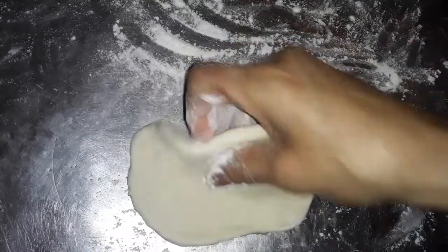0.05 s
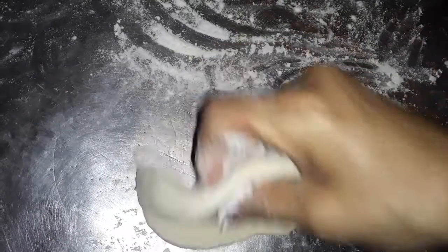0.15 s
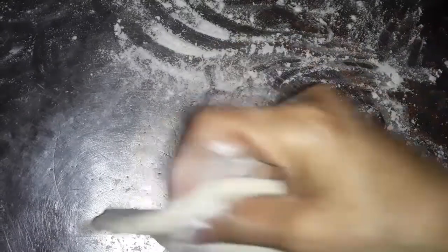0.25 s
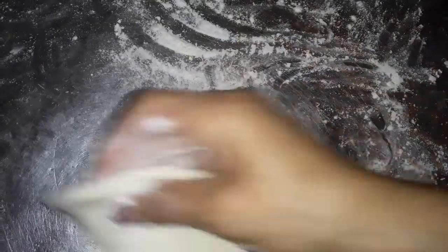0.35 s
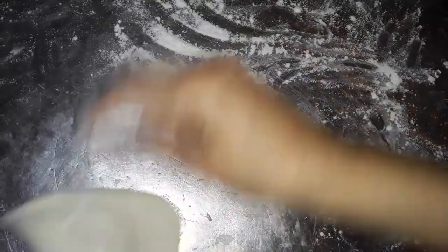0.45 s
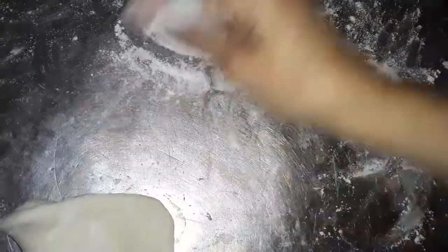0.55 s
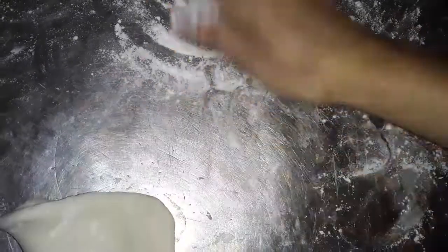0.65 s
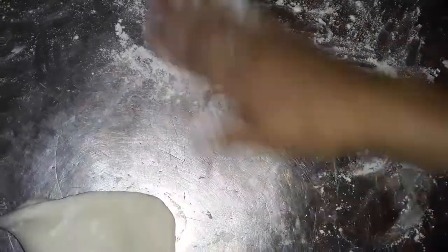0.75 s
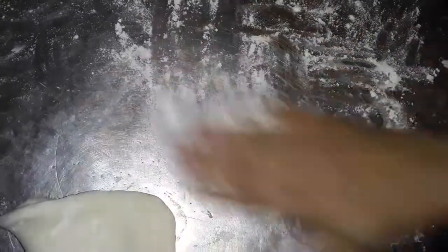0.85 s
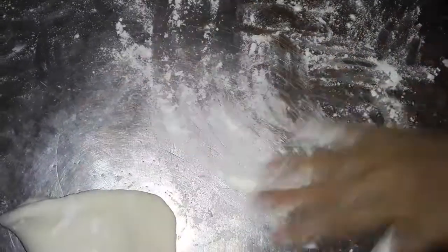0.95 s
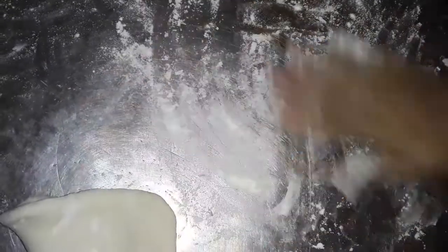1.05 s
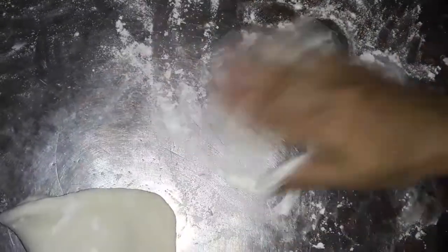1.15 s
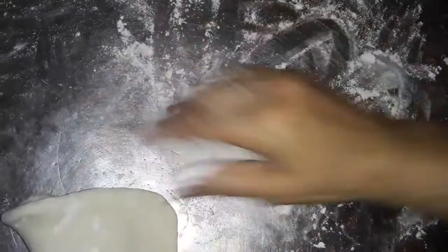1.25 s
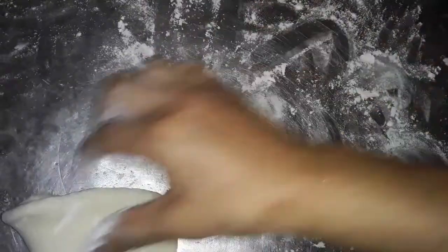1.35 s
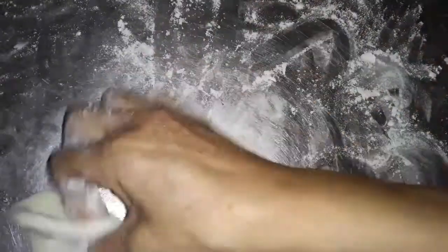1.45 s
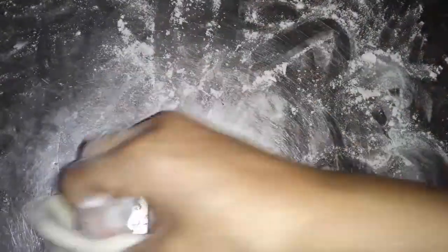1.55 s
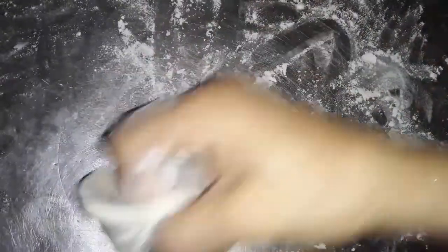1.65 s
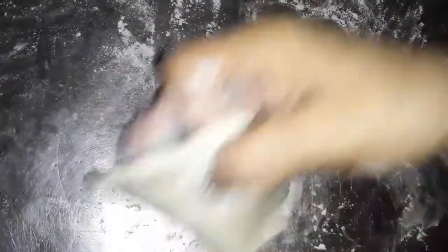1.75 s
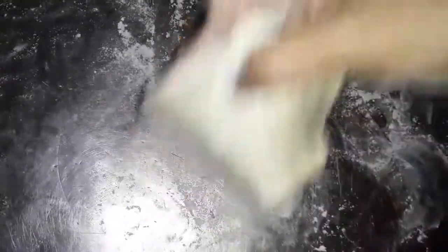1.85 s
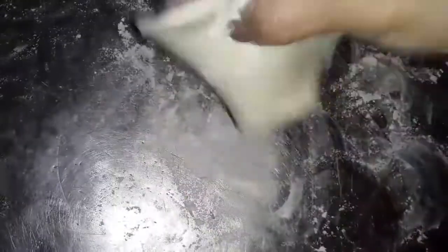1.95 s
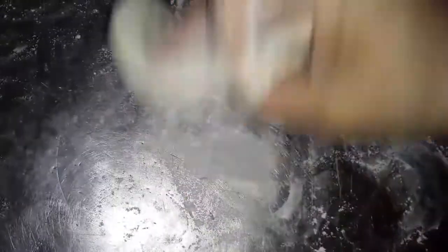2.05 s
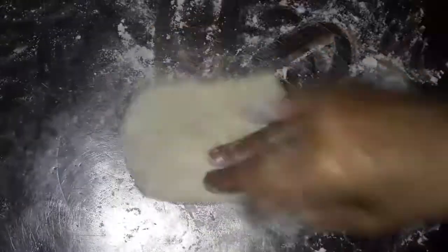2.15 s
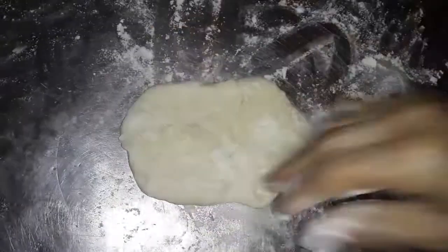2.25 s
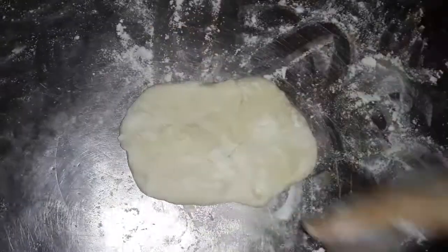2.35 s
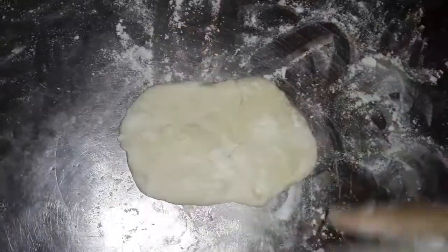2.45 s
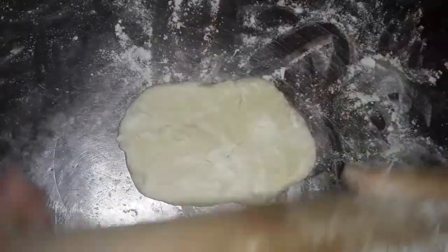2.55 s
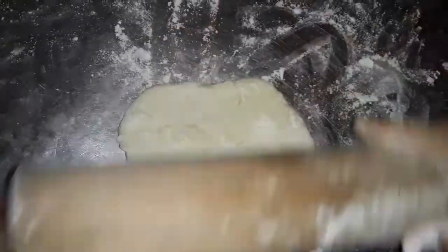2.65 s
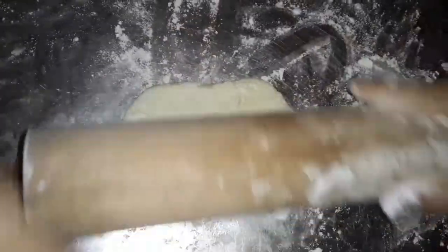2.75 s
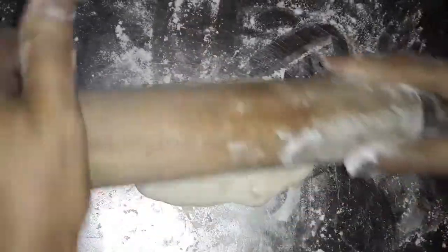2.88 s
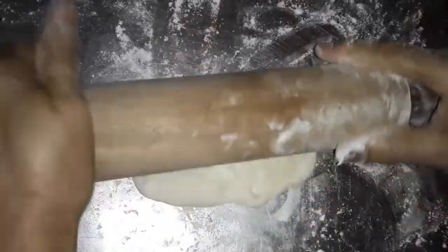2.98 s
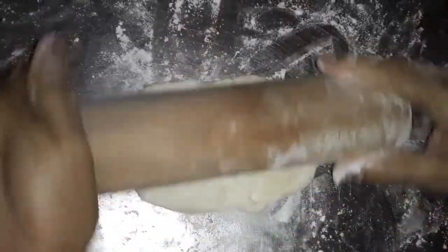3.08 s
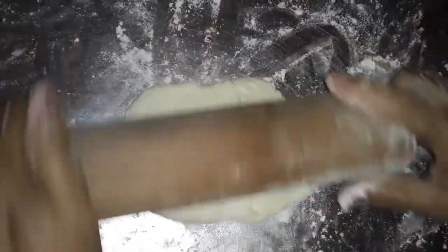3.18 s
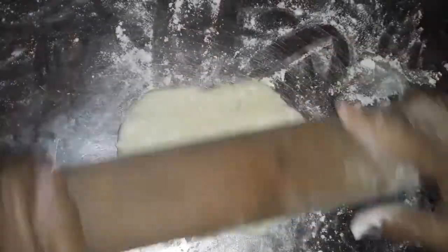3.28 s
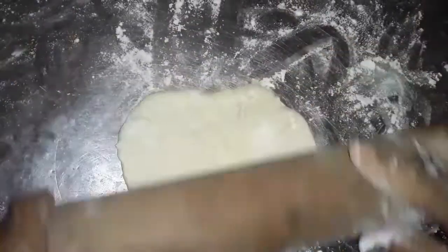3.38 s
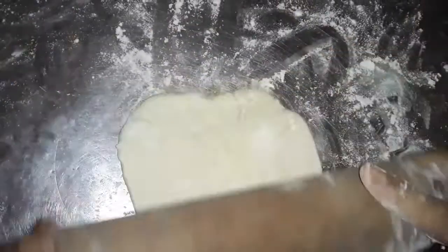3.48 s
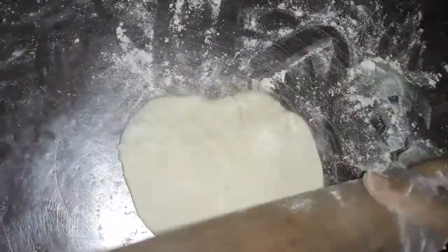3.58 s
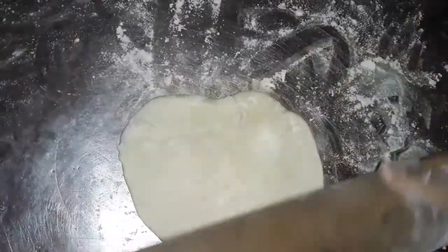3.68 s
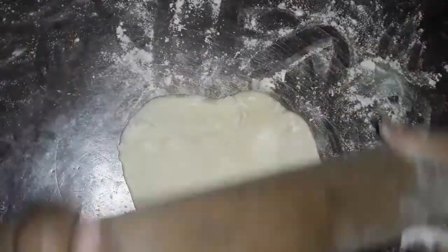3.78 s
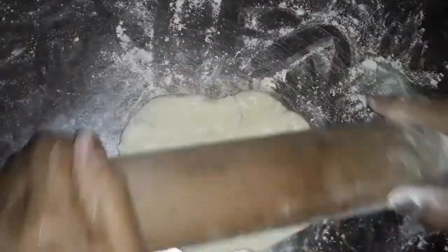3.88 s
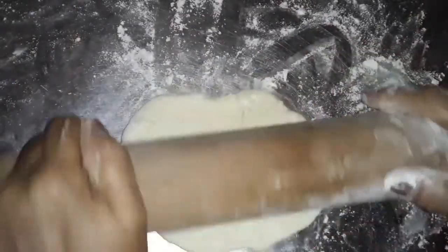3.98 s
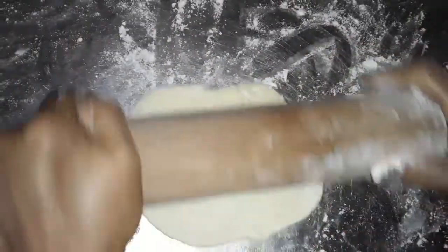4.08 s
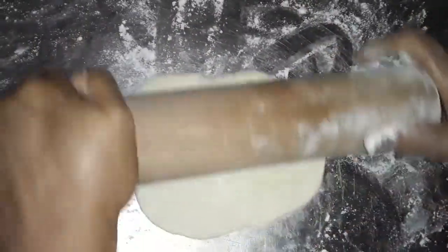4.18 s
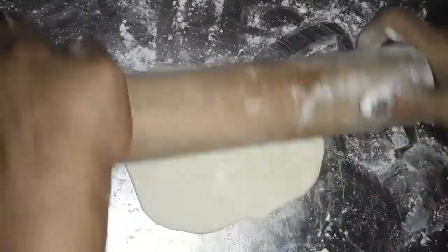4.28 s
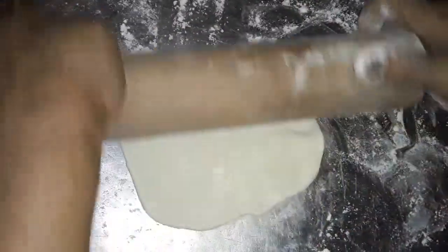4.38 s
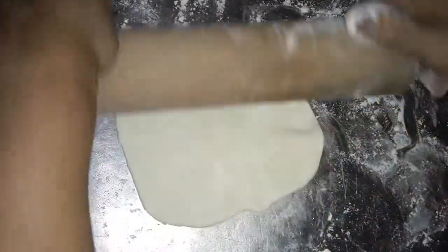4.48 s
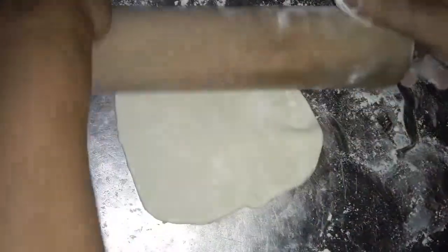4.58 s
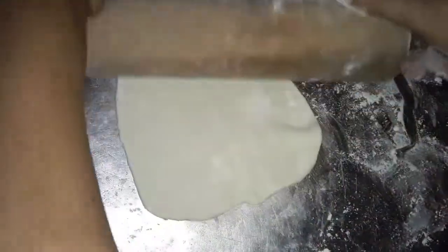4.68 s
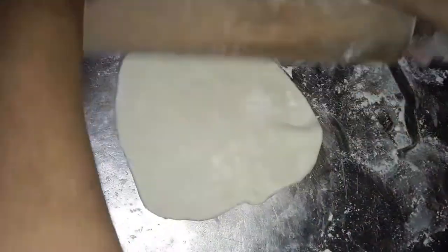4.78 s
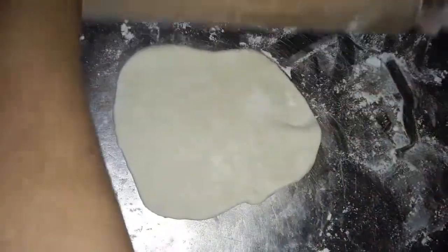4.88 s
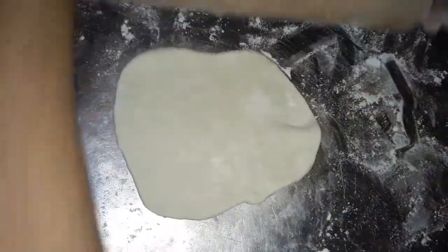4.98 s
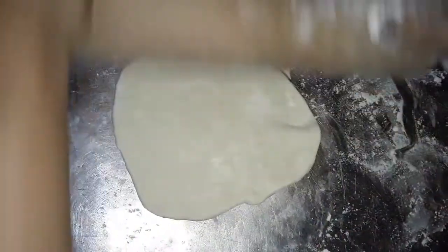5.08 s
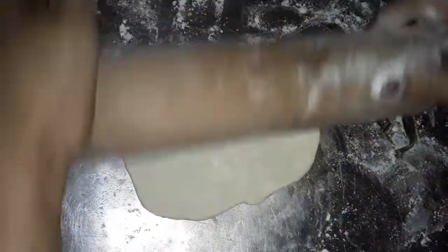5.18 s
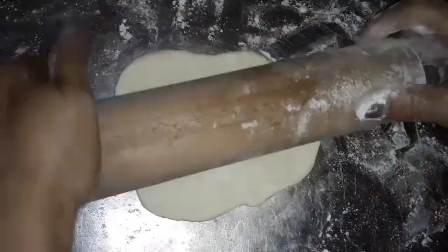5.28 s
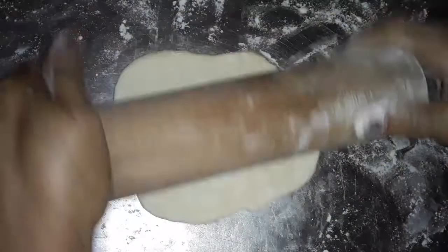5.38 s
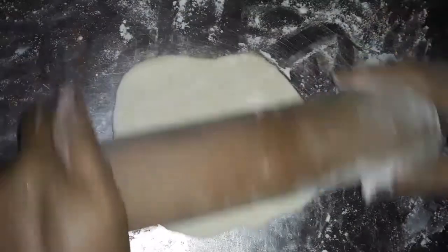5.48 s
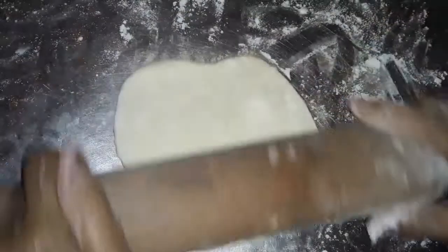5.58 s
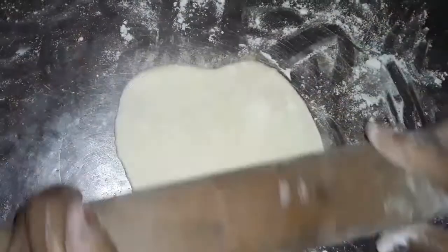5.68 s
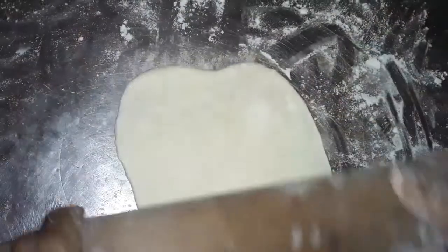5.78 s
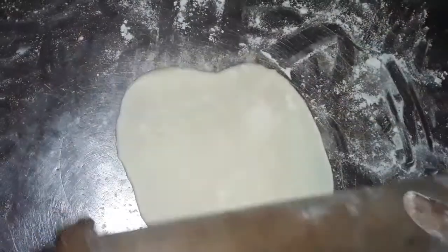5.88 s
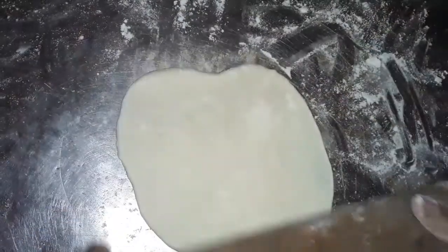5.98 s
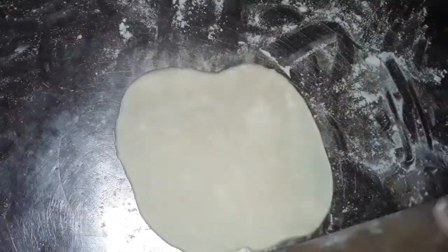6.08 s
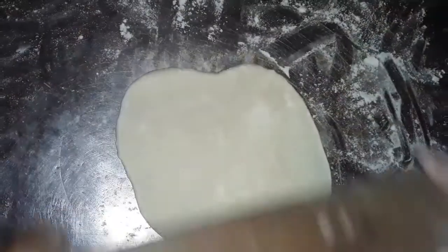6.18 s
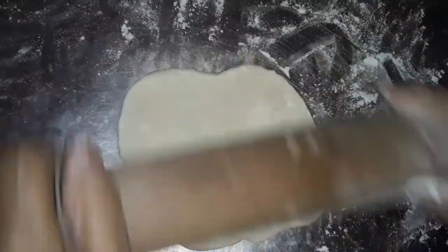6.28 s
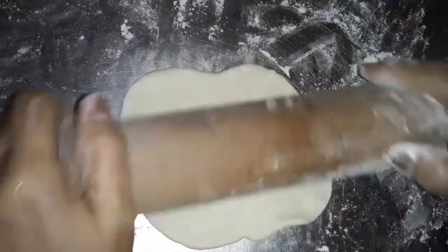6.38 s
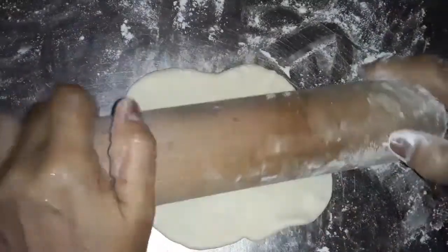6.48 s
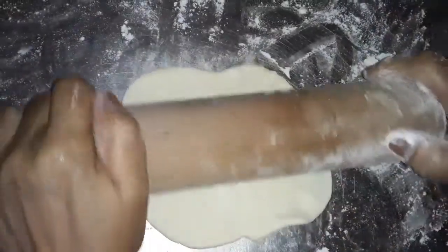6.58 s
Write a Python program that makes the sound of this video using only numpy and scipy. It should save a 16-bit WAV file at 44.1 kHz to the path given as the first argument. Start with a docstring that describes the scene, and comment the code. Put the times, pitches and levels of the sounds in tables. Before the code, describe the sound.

Gritty palm swipes over floured steel, a dough slap, then a wooden rolling pin knocks sharply on the ringing metal and rubs softly across dough.

```python
"""Dough on a steel counter

Hands and a wooden rolling pin work dough close to the microphone. Blows crack, ring the modes of the
steel sheet and boom late in the cabinet below. Palm and pin strokes hiss with grains of flour noise;
the pin rasps and squeaks. A quiet kitchen is shaped noise with a faint wavering whine of close lines."""
import sys
import numpy as np
from scipy import signal
from scipy.fft import rfft, irfft
from scipy.io import wavfile
from scipy.ndimage import uniform_filter1d

SR = 44100
rng = np.random.default_rng(int(sys.argv[2]) if len(sys.argv) > 2 else 0)


def to_wav(sig):
    """Store sig (one row per channel, or 1-D mono) as 16-bit WAV at the path in sys.argv[1].

    Samples outside -1..1 are clipped; the rate is SR.
    """
    pcm = np.clip(np.atleast_2d(sig), -1, 1) * 32767
    pcm = np.round(pcm).astype(np.int16)
    wavfile.write(sys.argv[1], SR, pcm.T)  # frames by channels


N = 292824


def undb(db):
    """Gain of a dB value."""
    return 10 ** (np.asarray(db) / 20)


def unit(x):
    """Scale to rms 1."""
    return x / np.sqrt(np.mean(x ** 2))


def band(x, lo_hz, hi_hz, order=2):
    """Band-pass filter."""
    edges_hz = [lo_hz, min(hi_hz, .45 * SR)]
    return signal.sosfilt(signal.butter(order, edges_hz, "band", fs=SR, output="sos"), x)


def colour(x, hz, db):
    """Shape the spectrum by (frequency, level) points, log-frequency interpolation."""
    f = np.fft.rfftfreq(len(x), 1 / SR) + 1
    return irfft(rfft(x) * undb(np.interp(np.log(f), np.log(hz), db)), len(x))


def narrow(hz, width_hz):
    """Noise in a narrow band, rms 1."""
    return unit(band(rng.standard_normal(N), hz - width_hz / 2, hz + width_hz / 2))


def grit(spread_db, size=N):
    """Dense grains of uneven size."""
    return rng.standard_normal(size) * undb(spread_db * rng.exponential(size=size))


def walk(rate_hz):
    """Random levels held 1 / rate_hz, smoothed twice over the same span; spread near 1."""
    k = int(SR / rate_hz)
    steps = np.repeat(rng.standard_normal(N // k + 1), k)
    return 1.3 * uniform_filter1d(uniform_filter1d(steps, k), k)[:N]


def curves(table):
    """Columns of a (time [s], value, ..) table, one value a sample."""
    s, *columns = np.transpose(table)
    return [np.interp(np.arange(N) / SR, s, c) for c in columns]


def fade(t, t60_s):
    """Exponential decay, 60 dB in t60_s."""
    return np.exp(-np.log(1000) * t / t60_s)


def ring(t, modes, extra_db, waver=1):
    """Decaying sine modes of alternating sign, each with its own extra weight and waver."""
    hz, db, t60_s = np.transpose(modes)[:, :, None]
    sign = (-1.) ** np.arange(len(modes))[:, None]
    gain = sign * undb(db + extra_db[:len(modes), None])
    return np.sum(gain * fade(t, t60_s) * np.sin(2 * np.pi * hz * t) * waver, axis=0)


# room noise spectrum: (frequency [Hz], relative density [dB per Hz])
ROOM_SPECTRUM = [(60, -5.5), (176, 0.5), (256, -19), (363, -11.5), (500, -24.5), (800, -34.5), (2700, -41),
                 (8200, -34), (16000, -33)]
ROOM_DB = -64.5


def room_air():
    """Steady room noise: shaped noise with a slow level waver."""
    air = unit(colour(rng.standard_normal(N), *np.transpose(ROOM_SPECTRUM)))
    return air * undb(ROOM_DB + 1.2 * walk(4.5))


# rough whine lines, full when on: (frequency [Hz], level [dB], width [Hz])
WHINE_LINES = [(2120, -78, 110), (4200, -73.5, 460)]
# clean whine line, before gating: (frequency [Hz], level [dB])
WHINE_TONE = (2066, -77.5)
# whine stands out: (start [s], length [s])
WHINE_SPANS = [(0.08, 0.62), (1.36, 0.42), (3.26, 0.19), (3.74, 0.3), (4.7, 0.6), (6.1, 0.45)]


def whine():
    """Thin whine: narrow noise lines and a phase-wavering sine that come and go."""
    t = np.arange(N) / SR
    gate = sum(1. * (t > start) * (t < start + length) for start, length in WHINE_SPANS)
    on = uniform_filter1d(gate, size=4000)
    rough = sum(undb(db) * narrow(hz, width_hz) for hz, db, width_hz in WHINE_LINES)
    tone_hz, tone_db = WHINE_TONE
    level = undb(tone_db + 3.4 * walk(12.0)) * np.sqrt(2)
    clean = level * np.sin(2 * np.pi * tone_hz * t + walk(27))
    return rough * (0.5 + .5 * on) + clean * (0.16 + on)


def kitchen():
    """Quiet room: air noise plus whine."""
    return room_air() + whine()


# palm and pin slides: (start [s], rise [s], hold [s], sag over hold [dB], grit [dB], drag [dB])
STROKES = [(0.0, 0.00074, 0.028, 1, -53.5, -63), (0.393, 0.036, 0.11, -1, -64.5, -73),
           (0.751, 0.062, 0.056, 6, -39.5, -49), (0.866, 0.021, 0.13, -2.5, -37.5, -43.5),
           (0.988, 0.07, 0.13, -5.5, -34.5, -44.5), (1.143, 0.075, 0.017, -2, -32.5, -43),
           (1.327, 0.086, 0.005, 3, -53.5, -61), (2.138, 0.087, 0.023, 2, -54, -62.5),
           (2.448, 0.011, 0.22, 3.5, -54.5, -59.5), (2.974, 0.049, 0.07, 0.5, -60, -74),
           (3.127, 0.028, 0.37, 0, -55.5, -65), (3.523, 0.036, 0.063, 4.5, -51.5, -63.5),
           (3.617, 0.057, 0.0092, 3.5, -47, -53), (3.853, 0.033, 0.049, -0.5, -61.5, -74),
           (4.04, 0.14, 0.36, -2.5, -55, -56.5), (4.52, 0.067, 0.33, -5, -61.5, -65.5),
           (4.785, 0.026, 0.018, -3.5, -55, -62), (5.13, 0.039, 0.17, -5, -61.5, -75),
           (5.293, 0.032, 0.25, 4.5, -57, -60), (5.58, 0.059, 0.31, -7, -59, -63),
           (5.996, 0.045, 0.0086, -6, -44.5, -51)]
RELEASE_DB_PER_S, RISE_POWER = 207, 1.42
REST_GRIT_DB, REST_DRAG_DB = -71.5, -73.5  # hands stirring between strokes


def strokes():
    """Gains of grit and drag: each stroke swells, holds with a level slope, dies away; powers add."""
    power = np.ones((2, N)) * undb([[REST_GRIT_DB], [REST_DRAG_DB]]) ** 2
    for s, rise, hold, sag_db, grit_db, drag_db in STROKES:
        rise, hold = max(rise, 1e-3), max(hold, 1e-3)
        at = slice(int(s * SR), min(int(s * SR) + SR, N))
        t = np.arange(N)[at] / SR
        late = t - s - rise
        swell = np.clip((t - s) / rise, 0, 1) ** RISE_POWER
        slope_db = sag_db * np.clip(late / hold, 0, 1)
        release_db = RELEASE_DB_PER_S * np.maximum(late - hold, 0)
        shape = swell * undb(slope_db - release_db)
        power[:, at] += (undb([[grit_db], [drag_db]]) * shape) ** 2
    return np.sqrt(power)


# steel sheet modes, also rung by the blows: (frequency [Hz], relative level [dB], t60 [s])
STEEL = [(176.25, 4.5, 0.5), (386.7, 0.5, 0.48), (474, -2, 0.21), (682, -4, 0.79), (700.5, -0.5, 0.35),
         (783, 1, 0.389), (946, -4.5, 0.3), (1250, -4.5, 0.32), (1393, -1, 0.3), (1594, -4, 0.35),
         (1884, -7.5, 0.31), (2370, -8, 0.45), (3240, -3.5, 0.46)]


def stirred_sheet(grains):
    """Grains excite the sheet's modes by convolution, rms 1."""
    t = np.arange(SR // 2) / SR
    return unit(signal.fftconvolve(grains, ring(t, STEEL, np.zeros(64)))[:N])


# hollow under the sweeping palm: (time [s], frequency [Hz])
CUP = [(0.82, 1352), (0.92, 1897), (1.02, 1247), (1.17, 1257), (1.23, 3700)]
CUP_DB = -1.5  # against the drag


def cupped_palm():
    """Gliding resonance of the palm's hollow: a sine with fast random amplitude."""
    n = np.arange(N)
    gate = (n > CUP[0][0] * SR) * (n < CUP[-1][0] * SR)
    phase = 2 * np.pi * np.cumsum(curves(CUP)[0]) / SR
    return undb(CUP_DB) * gate * walk(500) * np.sin(phase)


# low rumble: (time [s], level [dB])
ROLL = [(0.0, -68), (4.53, -56), (5.05, -64.5), (5.59, -53), (5.81, -65), (6.64, -66.5)]
FLOUR_DB = -4.5  # finest flour hiss against the grit


def rubbing():
    """Flour grit under palm and pin; drag and rumble also stir the sheet's modes."""
    hiss, pull = strokes()
    rumble_db, = curves(ROLL)
    grains = grit(1.0) * undb(1.1 * walk(40))
    sheet = stirred_sheet(grains)
    drag = unit(unit(band(grains, 700, 2180, order=3)) + 0.97 * band(sheet, 1000, 6000))
    drag = drag + cupped_palm()
    rumble = unit(unit(band(sheet, 53, 450)) + 1.48 * unit(band(grains, 67.5, 310)))
    fine = unit(band(grains, 3300, 12540)) + undb(FLOUR_DB) * unit(band(grains, 19000, 21400))
    side = band(hiss * grit(1.3), 6670, 11500)
    wide = undb(-22.0) * side * np.array([[1], [-1]])  # opposite sign left and right
    return hiss * fine + pull * drag + undb(rumble_db) * rumble + wide


# pin sticks and lets go: (time [s], level [dB], centre [Hz], t60 [s])
SLIPS = [(2.5343, -44, 5540, 0.1), (4.2433, -43, 4770, 0.064), (4.2954, -40.5, 4200, 0.027),
         (4.329, -42, 5000, 0.056), (4.3655, -40.5, 7200, 0.056), (4.4135, -45.5, 5600, 0.17),
         (4.4813, -42.5, 5000, 0.038), (5.335, -40, 2600, 0.081), (5.879, -48, 5000, 0.029)]


def slips():
    """Stick-slip rasps: short grit bursts, each with its own colour and decay."""
    out, t = np.zeros(N + SR), np.arange(4096) / SR
    attack = 1 - np.exp(-t / 0.0011)
    for s, db, hz, t60_s in SLIPS:
        noise = grit(1.5, size=len(t))
        rasp = unit(band(noise, hz / 1.86, hz * 1.59)) + 0.6 * unit(band(noise, 450, 900))
        at = int(s * SR)
        out[at:at + len(t)] += undb(db) * rasp * fade(t, t60_s) * attack
    return out[:N]


# pin squeaks and scuffs: (centre time [s], half length [s], level [dB], frequency [Hz], width [Hz])
SQUEAKS = [(3.33, 0.11, -54, 910, 800), (3.63, 0.04, -51, 2320, 110), (3.76, 0.042, -64, 2313, 60),
           (5.205, 0.065, -63, 5880, 730)]


def squeaks():
    """Rough squeaks: narrow noise under a Gaussian swell."""
    t = np.arange(N) / SR
    return sum(undb(db) * np.exp(-((t - s) / half) ** 2) * narrow(hz, width_hz)
               for s, half, db, hz, width_hz in SQUEAKS)


LEAD = 1024  # samples; room for a contact's build-up before its peak
RING = 30000  # samples a blow rings on


def contact_crack(noise, touch, hard, contact_ms, favour_hz, click=0.79):
    """Noise while the bodies touch; hard contacts click more, longer ones pass less treble."""
    crack = (noise * np.sqrt(touch) * np.exp(-2.5 * touch))[:SR // 10]
    crack[:2] += click * (4 + 12 * hard ** 2) / max(contact_ms, .5)
    crack += 13.0 * band(crack, favour_hz / 1.05, favour_hz * 1.05, order=1)
    crack += 8.0 * band(crack, 5100, 6400, order=1)  # the wood's own bright tock
    cutoff_hz = min(7000 + 6900.0 / contact_ms ** 2, 20000)
    return signal.sosfilt(signal.butter(4, cutoff_hz, fs=SR, output="sos"), crack)


ROUGH, ROUGH_HZ = 0.55, 2200  # uneven share (0-1) of the modes, full above ROUGH_HZ


def mode_waver():
    """Each mode is a cluster of close neighbours, so it beats unevenly."""
    share = ROUGH * np.minimum(np.array(STEEL)[:, :1] / ROUGH_HZ, 1)
    return 1 - share + share * np.array([walk(280) for _ in STEEL])


# unresolved modes and room: (frequency [Hz], relative level [dB], t60 [s])
WASH = [(278, 2.5, 0.85), (706, 4, 0.43), (2580, -13, 0.8), (5600, -3, 0.17)]
FAVOUR_DB, HARD_FAVOUR_DB = 8, 5.5  # lift of the favoured mode; added for bare wood


def sheet_tail(t, noise, touch, hard, favour_hz, waver, flutter_db, modes_db=-2.0):
    """Sheet modes and wash; the struck spot favours one mode, the near part dies first."""
    detune = np.log(np.array(STEEL)[:, 0] / favour_hz) / .05
    favour_db = (FAVOUR_DB + HARD_FAVOUR_DB * hard) * np.exp(-detune ** 2)
    tail = undb(modes_db) * ring(t, STEEL, favour_db, waver)
    for hz, db, t60_s in WASH:
        tail += undb(db) * unit(band(noise, hz / 1.38, hz * 1.58, order=1)) * fade(t, t60_s)
    return tail * (1 - np.exp(-touch)) * (1 + 2.93 * fade(t, 0.07)) * undb(flutter_db)


# cabinet modes: (frequency [Hz], relative level [dB], t60 [s])
BOOM = [(73.5, 14, 0.75), (109, 8, 0.4)]
BOOM_RISE_S = 0.043


def cabinet_boom(t, extra_db):
    """Low cabinet modes that swell late, each with its own extra weight."""
    return ring(t, BOOM, extra_db) * (1 - np.exp(-t / BOOM_RISE_S)) ** 2


# (time [s], level [dB], hardness [0 dough - 1 bare wood], thud re level [dB], tick re level [dB],
#  boom [dB], contact [ms], ring re crack [dB], favoured mode [Hz])
BLOWS = [(0.003, -40, 0.52, -6.5, -6.5, -86, 4.5, -16.5, 750),
         (0.49, -54, 0.51, -3.5, -23, -81, 6.8, -6, 560),
         (0.77, -52.5, 0.066, 19.5, -11, -53.5, 59, -16, 176),
         (1.385, -84, 0.94, 32, 21, -57.5, 21, -8, 182.7), (2.2, -39, 0.5, -1, -4, -47.5, 4.9, -6.5, 182),
         (2.221, -27, 0.21, -10, -50, -54.5, 2.7, -17.5, 704),
         (2.238, -14, 0.37, -7.5, -19, -61, 3.8, -22, 727),
         (2.573, -11.5, 0.85, -18, -15, -69.5, 1.6, -24, 1300),
         (2.650, -17, 0.96, -32, -6.5, -84, 5.1, -24.5, 3240),
         (3.031, -40.5, 0.6, 1, -6.5, -56.5, 7.5, -12.5, 890),
         (3.991, -50, 0.56, 6.5, -9, -78, 10, 1.5, 690),
         (4.0036, -12.5, 0.89, -18.5, -6, -34, 1.4, -23, 1790),
         (4.0066, -15.5, 1, -23, -22, -60, 5.4, -21.5, 3100),
         (4.528, -45.5, 0.45, 1, 0.5, -58.5, 11, -15, 470),
         (4.636, -36.5, 0.35, 4.5, -2.5, -82.5, 16, -25, 401),
         (4.757, -36.5, 0.69, -10, -9.5, -67, 3.8, -24, 946),
         (5.345, -25, 0.79, -6, -8, -45.5, 8.1, -20, 397),
         (5.588, -41, 0.55, -1.5, 2, -57.5, 3.8, -18.5, 422),
         (5.9584, -44, 0.94, -38, 24.5, -60, 0.55, -28, 2150),
         (6.39, -57.5, 0.7, 6.5, -15, -67, 5.4, -15.5, 302),
         (6.5315, -25.5, 0.27, 0.5, -13, -47, 3.3, -15, 718)]
# edges of the five tone bands: (frequency [Hz])
BAND_EDGES_HZ = [140, 500, 1100, 2200, 3500, 16000]
# three middle bands for dough, for bare wood: (level [dB])
SOFT_DB = [8, -7.5, -22.5]
HARD_DB = [-10.5, -2, 1.4]


def blows():
    """Crack, sheet ring and late boom; band levels make dough dull, bare wood on steel bright."""
    out, t = np.zeros(N + LEAD + RING), np.arange(RING) / SR
    flutter_db = 2 * walk(130)  # loose parts rattle on, so the ring is lumpy
    waver = mode_waver()
    for s, peak_db, hard, thud_db, tick_db, boom_db, contact_ms, ring_db, favour_hz in BLOWS:
        at = int(s * SR)
        chance_db, noise = rng.standard_normal(64), rng.standard_normal((2, RING))
        touch = t * 1000 / max(contact_ms, .5)  # time in contact lengths
        crack = contact_crack(noise[0], touch, hard, contact_ms, favour_hz)
        waver_now = np.roll(waver, -at, axis=1)[:, :RING]
        flutter_now_db = np.roll(flutter_db, -at)[:RING]
        tail = sheet_tail(t, noise[1], touch, hard, favour_hz, waver_now, flutter_now_db)
        middle_db = np.array(SOFT_DB) + hard * np.subtract(HARD_DB, SOFT_DB)
        tone_db = [thud_db, *middle_db, tick_db]
        for lo, hi, db in zip(BAND_EDGES_HZ, BAND_EDGES_HZ[1:], tone_db):
            sos = signal.butter(2, [lo, hi], "band", fs=SR, output="sos")
            fast = signal.sosfiltfilt(sos, np.pad(crack, (LEAD, 0)))  # zero phase: builds up early
            slow = band(tail, lo, hi, order=4)
            out[at:at + len(fast)] += undb(peak_db + db) * fast / np.abs(fast).max()
            out[at + LEAD:at + LEAD + RING] += undb(peak_db + db + ring_db) * slow
        out[at + LEAD:at + LEAD + RING] += undb(boom_db) * cabinet_boom(t, chance_db[32:])
    return out[LEAD:LEAD + N]


def scene():
    """All sources at the microphone, two channels."""
    return kitchen() + rubbing() + slips() + squeaks() + blows()


# microphone response: (frequency [Hz], level [dB])
MIC = [(5500, -3.5), (8300, -1.5), (9500, -14.5), (13000, -5.5), (16000, -3)]
BASS_CUT_HZ, TOP_HZ = 48, 15750


def record(dry):
    """The microphone port dips the treble near 9.5 kHz; bass and top are cut."""
    dry = np.array([colour(channel, *np.transpose(MIC)) for channel in dry])
    dry = signal.sosfilt(signal.butter(2, BASS_CUT_HZ, "high", fs=SR, output="sos"), dry)
    return signal.sosfilt(signal.ellip(10, .2, 80, TOP_HZ, fs=SR, output="sos"), dry)


dry = scene()
out = record(dry)
to_wav(out)
```